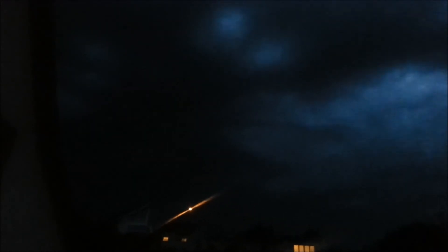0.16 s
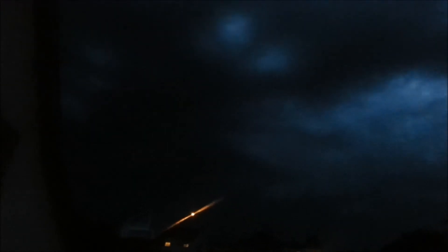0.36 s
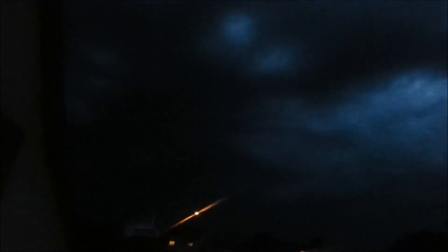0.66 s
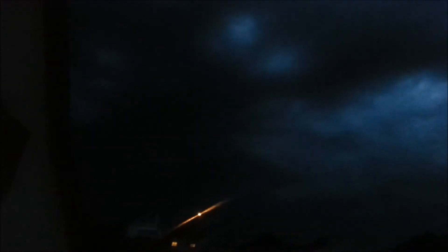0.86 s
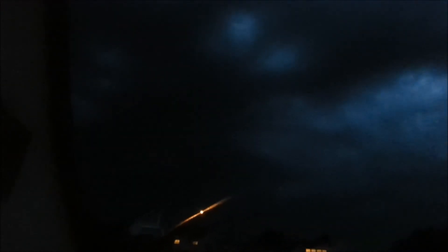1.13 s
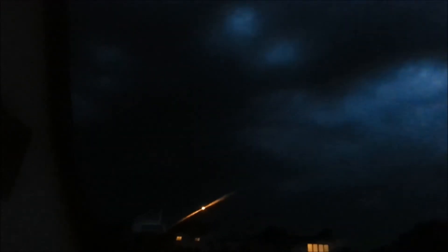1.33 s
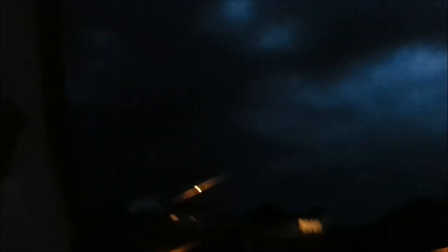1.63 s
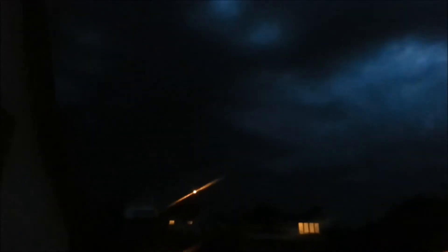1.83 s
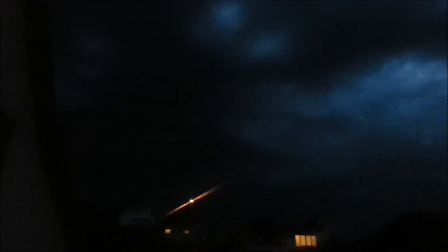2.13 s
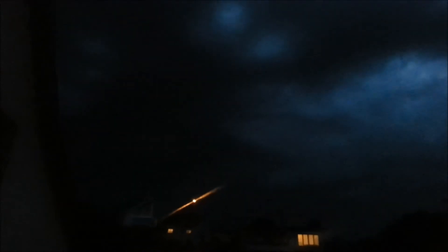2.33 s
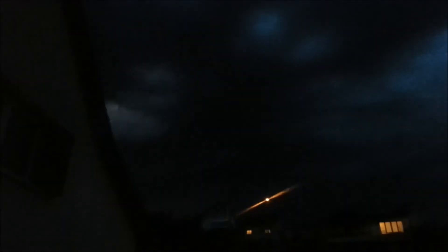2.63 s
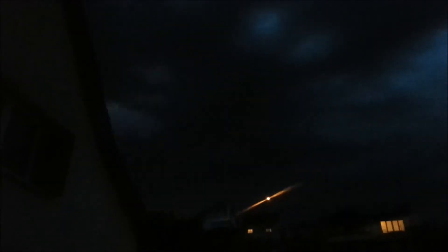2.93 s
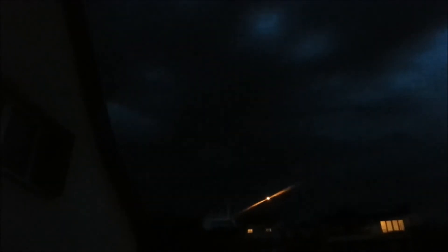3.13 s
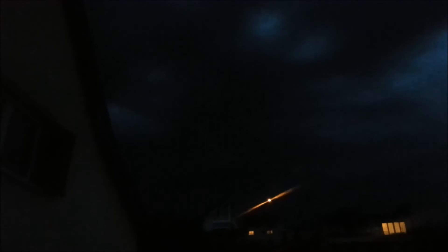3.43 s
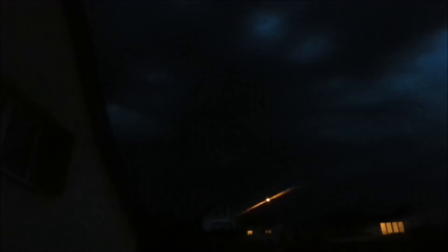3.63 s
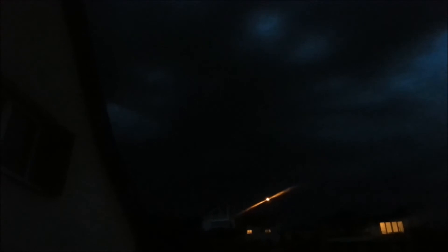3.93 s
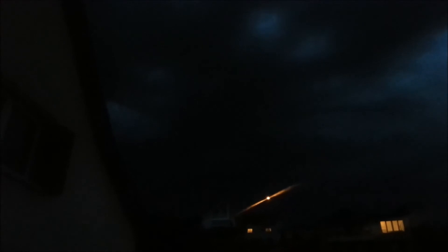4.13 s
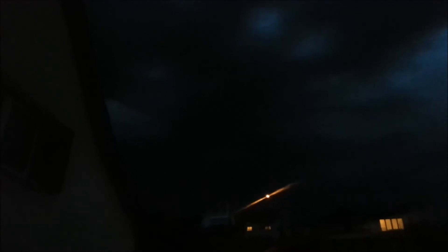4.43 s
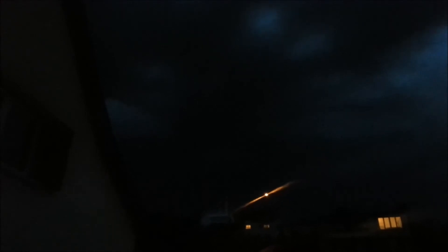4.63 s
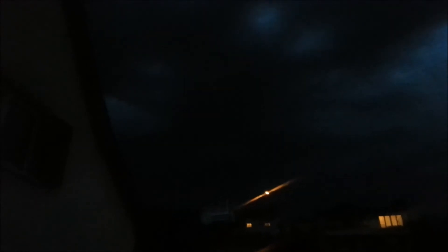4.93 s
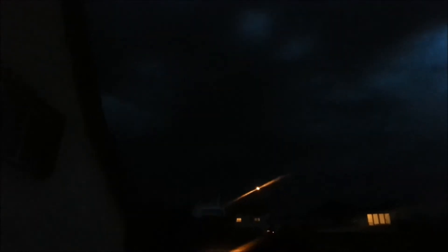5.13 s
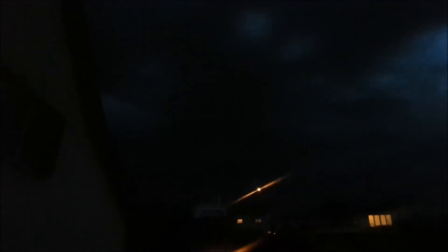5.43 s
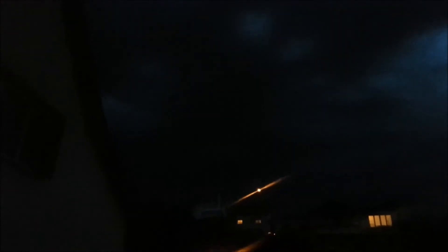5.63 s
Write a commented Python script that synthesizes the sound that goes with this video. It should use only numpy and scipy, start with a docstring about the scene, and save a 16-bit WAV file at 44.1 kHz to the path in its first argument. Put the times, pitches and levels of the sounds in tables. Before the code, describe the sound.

An old thunder roll fades under a blackbird's fluted song and a wheezing finch, then a new stroke crackles and breaks into heavy rolling booms.

```python
"""Thunder from an open window

At dusk an old roll dies away while a blackbird sings fluted glides and a finch wheezes in fast sweeps.
The near branches of a new stroke crackle, then the main channel arrives in heavy, rolling booms.
Thunder is a shower of random shocks, dulled by the air, piled into claps and scattered by house fronts.
Wind, a soft hiss, two ticks and a far town lie beneath; the loudest booms overload the small camera."""
import sys
import numpy as np
from scipy import signal
from scipy.fft import rfft, irfft, next_fast_len
from scipy.io import wavfile
from scipy.ndimage import uniform_filter1d

SR = 44100
rng = np.random.default_rng(int(sys.argv[2]) if len(sys.argv) > 2 else 0)


def to_wav(sig):
    """Store sig (one row per channel, or 1-D mono) as 16-bit WAV at the path in sys.argv[1].

    Samples outside -1..1 are clipped; the rate is SR.
    """
    pcm = np.clip(np.atleast_2d(sig), -1, 1) * 32767
    pcm = np.round(pcm).astype(np.int16)
    wavfile.write(sys.argv[1], SR, pcm.T)  # frames by channels


N = 254279
TIME = np.arange(N) / SR
SIZE = next_fast_len(N, real=True)
FREQ = np.fft.rfftfreq(SIZE, 1 / SR)

SPLIT_HZ = 399  # boom below, crack above
PLAIN_CLAP_HZ = 139  # where brightness depends on pitch, claps above this have more crack, deeper ones less
DEPTH_PER_LIFT = 0.68  # dB by which the deepest bass lags behind each dB of a swell
# the finch's wheeze swells, holds and stops while its pitch sinks and its sweeps widen and close
WHEEZE_START_S, WHEEZE_LENGTH_S, WHEEZE_ATTACK_S, WHEEZE_RELEASE_S = 1.86, 0.95, 0.35, 0.27
WHEEZE_HZ, SAG_HZ_PER_S = 4360, 1100
NARROW_SWEEP_HZ, WIDE_SWEEP_HZ, WIDEST_S = 290, 990, 2.43  # half spans, and the time of the widest
GUST_S, GUST_HALF_WIDTH_S, GUST_LIFT_DB = 1.35, 0.055, 7.5  # one puff of wind on the microphone
HISS_START_S, HISS_RISE_S = 2.736, 0.25
TOWN_DB = -53.5
WHINE_HZ = 3906  # rate of the clock wobble
TOP_HZ = 15700  # upper limit of the sound


def undb(db):
    """Logarithmic level: decibels to amplitude gain."""
    return 10 ** (np.asarray(db) / 20)


def unit(x):
    """Normalisation of the effective value: scale to rms 1."""
    return x / np.sqrt(np.mean(x ** 2))


def colour(x, points):
    """Spectral shaping: filter by (f/Hz, level/dB) points joined along log frequency."""
    hz, db = np.transpose(points)
    gain = undb(np.interp(np.log(FREQ + 1), np.log(hz), db))
    return irfft(rfft(x, SIZE) * gain, SIZE)[..., :N]


def band(x, hz, kind, order=4):
    """Butterworth filtering: maximally flat in the passband."""
    return signal.sosfilt(signal.butter(order, hz, kind, fs=SR, output="sos"), x)


def walk(rate):
    """Low-pass randomness: held chance values, smoothed twice, with a spread near 1."""
    k = int(SR / rate)
    steps = np.repeat(rng.standard_normal(N // k + 1), k)
    return 1.3 * uniform_filter1d(uniform_filter1d(steps, k), k)[:N]


def stereo(mid, side):
    """Sum and difference: left and right from mid and side."""
    return np.array([mid + side, mid - side])


def pan(db):
    """Level-difference panning: channel gains for a left-minus-right level."""
    return undb(np.array([[db], [-db]]) / 2)


def gate(start, length, rise, fall):
    """Excitation and decay: a linear rise, a hold, then exponential decay (all in s)."""
    return np.clip((TIME - start) / rise, 0, 1) * np.exp(-np.clip((TIME - start - length) / fall, 0, 20))


def swell(crest, width, lift_db):
    """Gaussian level contour: a smooth rise and fall in dB."""
    return lift_db * np.exp(-((TIME - crest) / width) ** 2)


def steady(x, seconds):
    """Level regulation: hold a stereo sound at rms 1 over the given time, keeping its finer grain."""
    power = uniform_filter1d(np.mean(x ** 2, axis=0), int(seconds * SR))
    return x / np.sqrt(power + 1e-12)


def shocks(per_s, spread_db):
    """Shot noise: a shower of pressure jumps, one from each kink of the lightning channel."""
    arrives = rng.random(N) < per_s / SR
    return unit(arrives * rng.choice([-1, 1], N) * undb(spread_db * rng.standard_normal(N)))


def thunder(roll, spectrum, per_s, boom_db, crack_db, crack_follows, crack_rise_s, depth_db, depth_db_per_s,
            wall_share, pan_db, clap_db=0, clap_crack_db=0, bright_db_per_octave=0, pitched_db=0, front_db=0):
    """Superposed shocks: dulled by the air, they swell with the roll and pile up into claps."""
    # long stretches of the channel that lift the roll: crest t/s, half width t/s, lift level/dB
    swells = [(0, .03, 5.5), (.3, 0.12, 7), (.58, 0.069, 6), (.77, 0.15, 8), (3.12, 0.056, 4.5),
              (3.48, 0.47, 5), (4.215, 0.089, 16.5), (4.38, 0.077, 6), (4.58, 0.14, 13), (4.85, 0.21, 5),
              (5.22, 0.051, 7), (5.35, 0.054, 12), (5.51, .07, 5), (5.73, 0.047, 9)]
    # stretches whose shocks arrive together: start t/s, length t/s, relative level/dB, nominal pitch f/Hz
    claps = [(2.932, 0.011, -58, 903), (2.98, 0.034, -50, 91), (3.047, 0.022, -49.5, 997),
             (3.077, 0.043, -38.5, 150), (3.229, 0.021, -36, 600), (3.367, 0.069, -39.5, 280),
             (3.478, 0.028, -40, 350), (3.542, 0.031, -40, 628), (3.631, 0.033, -42.5, 322),
             (3.735, 0.033, -41, 1435), (3.944, 0.083, -32, 254), (4.111, .05, -36, 455),
             (4.184, .062, -23, 185), (4.337, 0.032, -27, 342), (4.376, 0.04, -20.5, 240),
             (4.491, 0.031, -15.5, 180), (4.525, 0.12, -15.5, 120.2), (4.567, .014, -8.5, 125),
             (4.812, 0.051, -28.5, 150), (4.993, 0.1, -35, 478.2), (5.093, 0.054, -25.5, 260),
             (5.165, .027, -14, 139.4), (5.315, 0.036, -8.5, 138.2), (5.367, 0.026, -11.5, 133.8),
             (5.445, 0.011, -16, 125), (5.479, 0.027, -12, 137), (5.655, 0.027, -21, 219),
             (5.691, 0.0265, -9.5, 160.4)]
    # share of the thunder scattered by the house fronts: f/Hz, side minus mid level/dB
    scatter = [(30, -6), (130, -15), (300, -11), (600, -4), (1400, -5.5), (3000, -0.5), (7000, -10.5),
               (12000, -33.5)]

    start, end = roll
    lift_db = sum(swell(*row) for row in swells if start <= row[0] < end)
    roll_gate = gate(start - .02, end - start, rise=0.022, fall=0.053)
    # boom and crack are powers, so that claps add as unrelated sounds do
    boom = (roll_gate * undb(boom_db + lift_db)) ** 2
    crack = undb(crack_db + crack_follows * lift_db) ** 2
    opening = gate(start - .02, end - start, rise=crack_rise_s, fall=0.015)  # a roll starts dull and brightens
    direct = shocks(per_s, spread_db=0.5)
    pitched = np.zeros(N)
    uneven_time = np.cumsum(1 + 0.32 * walk(1100)) / SR
    for s, length, low_db, hz in claps:
        if start - .02 <= s < end - .02:
            high_db = low_db + clap_crack_db + bright_db_per_octave * np.log2(hz / PLAIN_CLAP_HZ)
            burst = gate(s, length, rise=0.00062, fall=0.0046)
            boom = boom + (burst * undb(low_db + clap_db)) ** 2
            crack = crack + (burst * undb(high_db)) ** 2
            direct[int((s + .004) * SR)] += undb(front_db)  # one strong shock leads each clap
            # roughly even spacing of the kinks gives each clap a rough pitch
            on = burst > .001
            train = np.sqrt(2) * np.sin(2 * np.pi * hz * uneven_time[on])
            pitched[on] += train * burst[on] * undb(low_db + pitched_db)

    # a nearby wall repeats every shock; the house fronts add a denser scatter from the sides
    direct = direct + wall_share * np.interp(TIME - .0165, TIME, direct)
    scattered = colour(shocks(4000, spread_db=5.5), scatter)
    air = colour(stereo(unit(direct), scattered), spectrum)
    # the weight of the deepest bass changes steadily as farther parts of the channel arrive
    bass = colour(air, [(60, 0), (110, -8.0), (200, -35.0)])
    elapsed = np.clip(TIME, start, end) - start
    bass_db = depth_db + depth_db_per_s * elapsed - DEPTH_PER_LIFT * lift_db
    air = air + bass * (undb(bass_db) - 1)
    low = steady(band(air, SPLIT_HZ, "low", order=5), seconds=0.0222)
    high = steady(band(air, SPLIT_HZ, "high", order=5), seconds=0.06)
    return (low * np.sqrt(boom) + high * np.sqrt(crack) * opening + pitched) * pan(pan_db)


def gardens(x, t60, wet_db, pan_db):
    """Reverberation: a bird off to the left, with a decaying tail of echoes from walls and trees."""
    t = TIME[:SR]
    sparse = rng.standard_normal((2, SR)) * (rng.random((2, SR)) < .02)
    echoes = sparse * undb(-60 * t / t60) * (t > .008)
    echoes /= np.sqrt(np.sum(echoes ** 2, axis=1, keepdims=True))
    tail = signal.fftconvolve(x[None], echoes, axes=1)[:, :N]
    return x * pan(pan_db) + undb(wet_db) * tail * pan(2.6)


def whistle(hz, overtone_db):
    """Harmonic synthesis: a bird's nearly pure tone with its octave overtone."""
    phase = 2 * np.pi * np.cumsum(hz) / SR
    return np.sqrt(2) * (np.sin(phase) + undb(overtone_db) * np.sin(2 * phase))


def blackbird(warble_hz, db):
    """Frequency modulation: fluted glides, some of them broken into a fast warble."""
    # start t/s, length t/s, start f/Hz, end f/Hz, relative level/dB, nominal warble depth f/Hz,
    # octave overtone relative to the fundamental level/dB
    notes = [(.546, .051, 2094, 2004, -58.5, 0, -33), (0.606, 0.0755, 2753, 2990, -57.5, 176, -35),
             (0.669, 0.14, 1994, 2178, -50, -7, -32), (0.79, 0.067, 2320, 1863, -54, 206, -32),
             (0.999, 0.039, 2080, 1984, -49, -3, -32), (1.037, 0.053, 1950, 2086, -48.5, 40, -29),
             (1.088, 0.038, 2120, 1690, -67, 0, -3), (1.213, .05, 1480, 1660, -72, -13, -2),
             (1.26, 0.12, 1670, 1940, -54, -5, -23), (1.366, 0.087, 1966, 2102, -53, 15, -18.5),
             (1.571, .105, 1850, 1630, -56, 0, -27), (1.752, 0.1, 2706, 2487, -57, 130, -25),
             (1.777, 0.33, 1994, 2070, -58.5, 113, -23), (1.861, 0.11, 2630, 2580, -55, 40, -20),
             (2.149, 0.083, 1763, 1950, -61, 2, -30), (2.242, 0.07, 2610, 2175, -54.5, 230, -32),
             (2.397, 0.26, 2110, 1970, -56, 75, -30), (2.695, 0.2, 2150, 1964, -64, 58, -23),
             (3.115, 0.13, 3560, 3380, -65, 70, -30), (3.405, 0.04, 2010, 2080, -49, -3, -28),
             (3.572, .13, 3280, 3240, -64, 56, -27)]
    song = np.zeros(N)
    waver = walk(120)
    uneven_rate = warble_hz * (1 + 0.22 * walk(40))
    warble = np.sin(2 * np.pi * np.cumsum(uneven_rate) / SR) * (0.82 + 0.66 * walk(90))
    for s, length, first, last, note_db, depth, overtone_db in notes:
        i = np.arange(int(s * SR), int((s + length) * SR))
        hz = np.linspace(first, last, len(i)) + depth * warble[i] + 14 * waver[i]
        envelope = signal.windows.tukey(len(i), .3)
        song[i] += whistle(hz, overtone_db) * envelope * undb(note_db + db)
    return gardens(song, t60=0.58, wet_db=1.0, pan_db=14.5)


def finch(sweeps_hz, db):
    """Sawtooth frequency modulation: a buzz of very fast downward sweeps that sinks as a whole."""
    age, end = TIME - WHEEZE_START_S, WHEEZE_START_S + WHEEZE_LENGTH_S
    centre = WHEEZE_HZ - SAG_HZ_PER_S * np.clip(age, 0, WHEEZE_LENGTH_S)
    sweep = np.interp(TIME, [WHEEZE_START_S, WIDEST_S, end], [NARROW_SWEEP_HZ, WIDE_SWEEP_HZ, NARROW_SWEEP_HZ])
    sings = np.clip(age / WHEEZE_ATTACK_S, 0, 1) * np.clip((end - TIME) / WHEEZE_RELEASE_S, 0, 1)
    cycle = np.cumsum(sweeps_hz * (1 + .07 * walk(110))) / SR % 1
    tone = whistle(centre + sweep * (1 - 2 * cycle) + 40 * walk(330), overtone_db=-28)
    pulsed = tone * np.sin(np.pi * cycle) * sings  # each sweep fades in and out
    buzz = band(pulsed, 3050, "high", order=10)
    return gardens(buzz * undb(db), t60=.65, wet_db=1, pan_db=12)


def hiss(db):
    """Incoherent noise: smooth treble, unrelated left and right, that comes up as the new stroke nears."""
    points = [(800, -14.0), (2200, 2), (4000, -4.5), (7000, -7), (8200, -29.0), (14000, -29.5)]
    air = colour(rng.standard_normal((2, N)), points)
    return unit(air) * undb(db) * np.clip((TIME - HISS_START_S) / HISS_RISE_S, 0, 1)


def ticks():
    """Impulsive noise: tiny dry clicks of plastic."""
    # clicks of the camera body in the hand: t/s, level/dB
    tick_rows = [(2.712, -53.5), (2.756, -55)]
    strength = sum(undb(db) * gate(s, .0005, rise=0.00032, fall=0.001) for s, db in tick_rows)
    grain = band(rng.standard_normal((2, N)), [2500, 8000], "band", order=2)
    return strength * unit(grain) * pan(6.1)


def wind(db):
    """Turbulent pressure: soft low buffeting on the microphone, with one gust."""
    gusts = stereo(rng.standard_normal(N), undb(-12.5) * rng.standard_normal(N))
    buffeting = steady(band(gusts, [14, 65], "band", order=2), seconds=0.12)
    return buffeting * undb(db + swell(GUST_S, GUST_HALF_WIDTH_S, GUST_LIFT_DB))


def town():
    """Shaped diffuse noise: far traffic with a slight drone, wavering a little."""
    # colour of the quiet town: f/Hz, relative level/dB per Hz
    town_colour = [(30, 4), (60, 0), (90, -17), (135, -8.5), (165, 0), (195, -6.5), (400, -11),
                   (700, -12.5), (1500, -19.5), (2800, -32.5), (4300, -37), (6000, -43), (10000, -46.5),
                   (15000, -60)]
    murk = colour(stereo(rng.standard_normal(N), rng.standard_normal(N)), town_colour)
    return unit(murk) * undb(TOWN_DB + 0.25 * walk(11.0)) * pan(4.35)


def scene():
    """Linear superposition: rolls of thunder over the birds and the town."""
    # colour of the old roll, the near branches and the main channel: f/Hz, relative level/dB per Hz
    old_colour = [(25, -17), (50, -15), (120, 3), (177, -2), (238, 3), (400, -4.5), (600, -9.5), (900, -47),
                  (2000, -63)]
    near_colour = [(20, -31), (40, -9), (98, -10.5), (152, 10.5), (206, -8), (296, 2), (450, -4.5),
                   (650, -3), (917, -8), (1400, -9), (2200, -20), (3400, -33), (7000, -47.5), (14000, -53)]
    main_colour = [(20, -23.5), (45, -24.5), (75, -3.5), (115, -2.5), (160, 2), (205, -3), (270, -3.5),
                   (390, -12.5), (520, -23), (700, -21.5), (1500, -37), (2800, -59), (7000, -70),
                   (10000, -69)]
    # each roll is (start s, end s); the main channel comes in two peals
    old = thunder((-.1, .86), old_colour, per_s=1300, boom_db=-53.5, crack_db=-73, crack_follows=2.37,
                  crack_rise_s=.03, depth_db=14.5, depth_db_per_s=-14, wall_share=0.39, pan_db=2.5)
    near = thunder((2.93, 3.94), near_colour, per_s=900, boom_db=-54, crack_db=-57.5, crack_follows=1.56,
                   crack_rise_s=0.023, depth_db=14, depth_db_per_s=-11, wall_share=0.4, pan_db=0.9,
                   clap_db=-7.0, clap_crack_db=-7.5, bright_db_per_octave=0.0, pitched_db=-5.0, front_db=18.5)
    first = thunder((3.94, 5.165), main_colour, per_s=1100, boom_db=-38, crack_db=-41.5, crack_follows=0.18,
                    crack_rise_s=0.12, depth_db=0, depth_db_per_s=6.5, wall_share=0.27, pan_db=0.34,
                    clap_db=-9.5, clap_crack_db=-23.0, bright_db_per_octave=8, pitched_db=-5.0, front_db=18.5)
    second = thunder((5.165, 5.85), main_colour, per_s=1100, boom_db=-28.0, crack_db=-37, crack_follows=0.21,
                     crack_rise_s=0.031, depth_db=10.5, depth_db_per_s=-7, wall_share=0.29, pan_db=0.3,
                     clap_db=-5, clap_crack_db=-21.0, bright_db_per_octave=14, pitched_db=-7.5, front_db=19)
    birds = blackbird(warble_hz=65.8, db=-8.0) + finch(sweeps_hz=167.5, db=-55.0)
    background = hiss(db=-64.0) + ticks() + wind(db=-56.5) + town()
    return old + near + first + second + birds + background


def record(dry):
    """Saturation and clock jitter: the camera flattens peaks; its wobbling clock adds a metallic whine."""
    ceiling = .52
    held = dry / (1 + (dry / ceiling) ** 8) ** (1 / 8)
    held = held * np.clip((TIME[-1] - TIME) / .006, 0, 1)  # short closing fade
    # timing error in samples: it mirrors every sound around multiples of the wobble rate
    early = sum(undb(-18.0 - 5.3 * k) * 2 * np.cos(2 * np.pi * (k + 1) * WHINE_HZ * TIME) for k in range(4))
    shifted = held + early * np.gradient(held, axis=1)
    return signal.sosfilt(signal.ellip(8, .2, 70, TOP_HZ, fs=SR, output="sos"), shifted)


dry = scene()
out = record(dry)
to_wav(out)
```